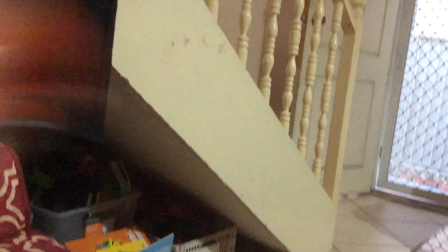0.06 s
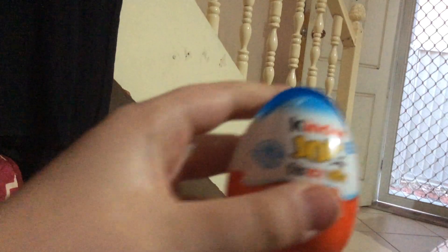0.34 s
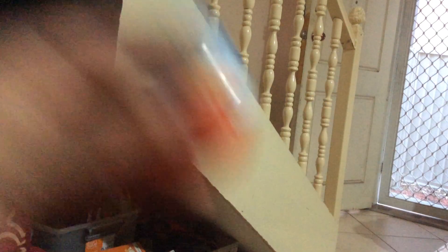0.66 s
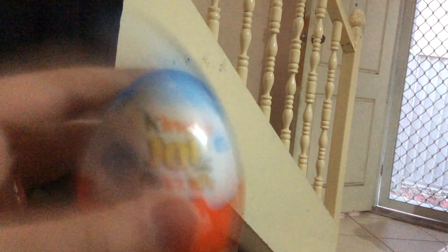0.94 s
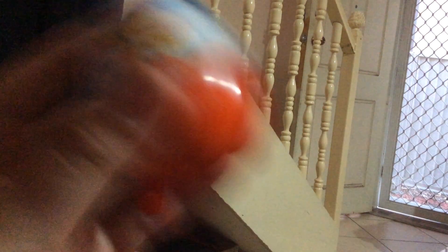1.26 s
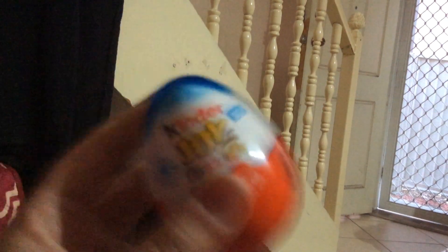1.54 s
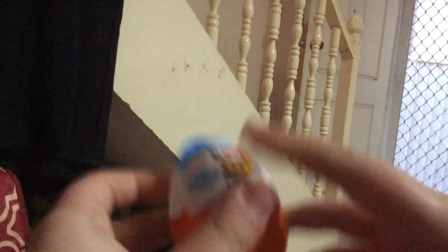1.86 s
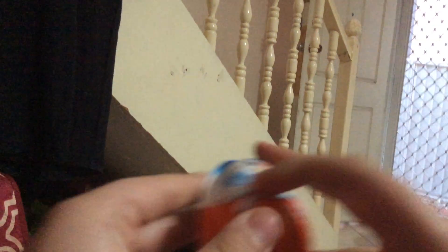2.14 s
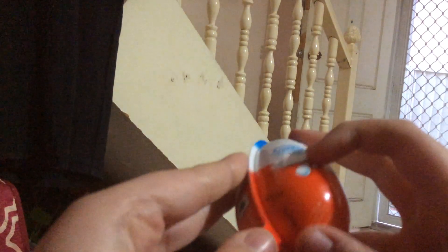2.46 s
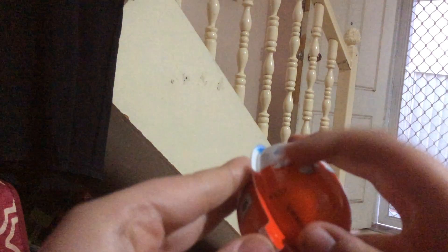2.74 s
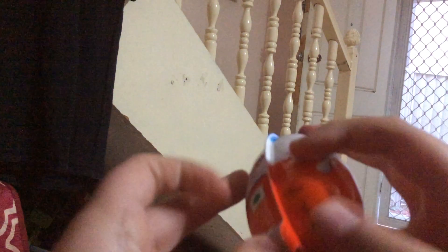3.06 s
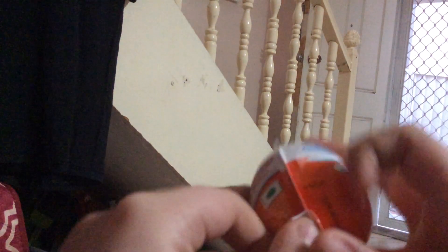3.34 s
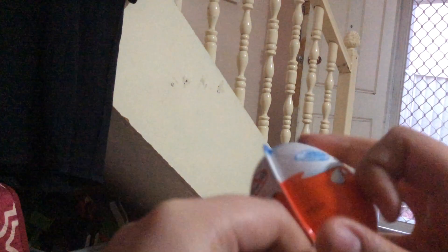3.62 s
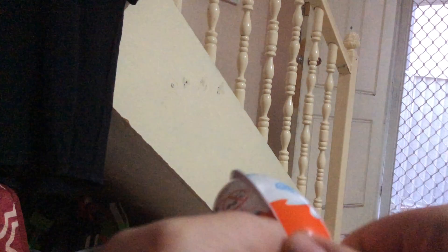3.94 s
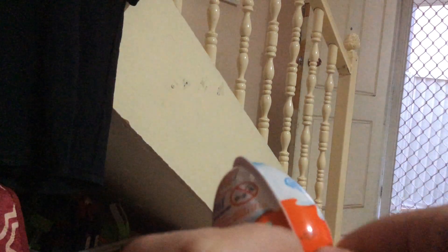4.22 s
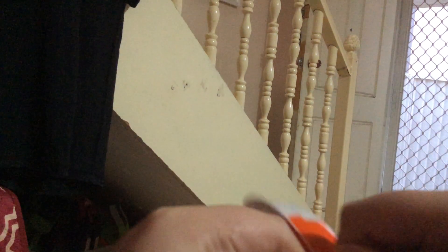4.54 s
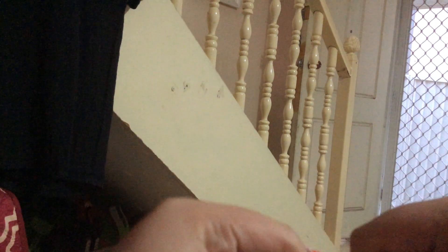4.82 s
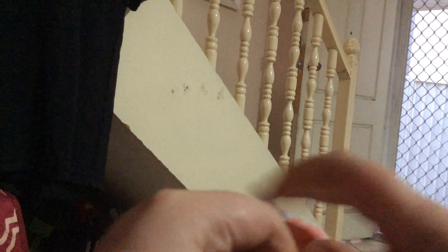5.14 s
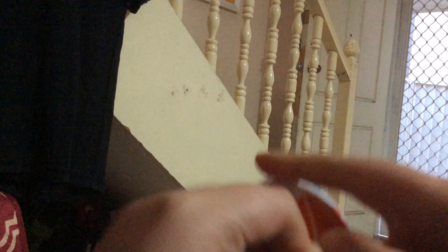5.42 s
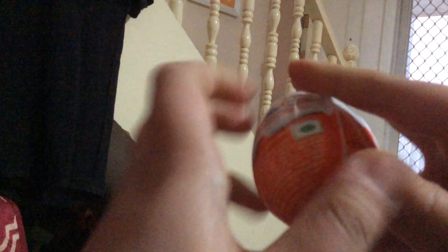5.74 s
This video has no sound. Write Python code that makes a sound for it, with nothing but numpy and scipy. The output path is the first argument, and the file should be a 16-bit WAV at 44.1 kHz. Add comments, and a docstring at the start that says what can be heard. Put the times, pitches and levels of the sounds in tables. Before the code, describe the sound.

Close to the microphone, hands turn a foil-wrapped plastic egg in a quiet room. Fine crinkling and a few snaps lead into a dense burst of sharp crackles with small knocks on the shell. A brief low drone passes, then fingers slide softly over the foil. More snaps follow, the loudest late on, before the grip gives two faint squeaks with a short hollow tone between them.

```python
"""Hands turn a foil-wrapped plastic egg close by, over the faint rumble and hiss of a quiet room.
From the start fingers slide on the foil, and friction excites a fine crinkling. Picked at, creases
buckle and knock the shell: a few snaps at 0.2 s, then a dense burst from 0.8 to 1.6 s. Near 1.9 s
something drones briefly in the bass. Soft sliding follows, with snaps at 3.5 s and the loudest at 4.6 s.
Last, the grip squeaks faintly twice near 3 kHz, with a faint, brief hollow tone near 1 kHz between."""
import sys
import numpy as np
from scipy import signal
from scipy.fft import rfft, irfft, next_fast_len
from scipy.io import wavfile
from scipy.ndimage import map_coordinates

SR = 44100
rng = np.random.default_rng(int(sys.argv[2]) if len(sys.argv) > 2 else 0)


def transcribe(signal):
    """Save signal, clipped to [-1, 1], as a 16-bit WAV file at the path in sys.argv[1]."""
    frames = np.atleast_2d(signal).T
    limited = np.clip(frames, -1, 1)
    pcm = np.round(limited * 32767).astype(np.int16)
    wavfile.write(sys.argv[1], SR, pcm)


N = 254898


def amp(db):
    """Amplitude ratio of a level in decibels."""
    return 10 ** (np.asarray(db) / 20)


def unit(x):
    """Normalisation to rms 1."""
    return x / np.sqrt(np.mean(np.abs(x) ** 2) + 1e-20)


def along(points, hz):
    """Interpolation of (f, value) points on a logarithmic frequency axis."""
    f, v = np.transpose(points)
    return np.interp(np.log(hz + 1), np.log(f + 1), v)


def wobble(knots, size):
    """Spline interpolation through random knots: a smooth random curve."""
    return map_coordinates(rng.standard_normal(int(knots) + 4), [np.arange(size) * knots / size])


def filtered(x, response):
    """Linear filtering: the spectrum of x times a frequency response."""
    m = next_fast_len(N + 8192)
    return irfft(rfft(x, m) * response(np.fft.rfftfreq(m, 1 / SR)), m)[:N]


def noise(spectrum):
    """Spectral shaping of white noise, at rms 1."""
    return unit(filtered(rng.standard_normal(N), lambda hz: amp(along(spectrum, hz))))


def ring(gain):
    """Minimum phase: the causal impulse response of a gain curve."""
    cepstrum = irfft(np.log(np.maximum(gain, 1e-6)))
    cepstrum[1:] *= 2
    cepstrum[len(cepstrum) // 2:] = 0
    return irfft(np.exp(rfft(cepstrum)))


def add(track, s, sound):
    """Superposition of a sound on the track at time s."""
    part = track[max(round(s * SR), 0):][:len(sound)]
    part += sound[:len(part)]


def envelope(start_s, length_s, attack_s, release_s, arch_db=4):
    """Exponential rise to the start, an arch over the length, then exponential decay."""
    gain = np.zeros(N)
    near = np.arange(max(int((start_s - .5) * SR), 0), min(int((start_s + length_s + .5) * SR), N))
    t = near / SR - start_s
    arch = amp(-arch_db * (2 * np.clip(t / length_s, 0, 1) - 1) ** 2)
    gain[near] = arch * np.exp(np.minimum(t, 0) / attack_s - np.maximum(t - length_s, 0) / release_s)
    return gain


# Spectra of the room's rumble and hiss: f/Hz, relative spectral density/dB
RUMBLE_SPECTRUM = [(13, -18), (22, -8.5), (59, 4.5), (77, -2.5), (97, -6.5), (135, -5), (178, -13.5),
                   (204, -15), (220, -7.5), (290, -44.5), (480, -120)]
HISS_SPECTRUM = [(80, 3.5), (200, 4), (600, -1), (1200, -3.5), (2500, -12), (6000, -21.5), (10000, -20),
                 (16000, -25)]
# Their slow drift: t/s, relative rumble level/dB, relative hiss level/dB
AMBIENT_LEVELS = [(0.0, -68, -65.5), (1.32, -61.5, -69), (2.35, -67.5, -71.5), (5.78, -68.5, -72.5)]


def ambient_noise(rumble_gain_db=1, hiss_gain_db=2):
    """Incoherent addition of two coloured noises: the room's low rumble and soft hiss."""
    t = np.arange(N) / SR
    times, rumble_db, hiss_db = np.transpose(AMBIENT_LEVELS)
    rumble = amp(np.interp(t, times, rumble_db) + rumble_gain_db) * noise(RUMBLE_SPECTRUM)
    hiss = amp(np.interp(t, times, hiss_db) + hiss_gain_db) * noise(HISS_SPECTRUM)
    return rumble + hiss


# Fingers sliding over the foil: t/s, duration/s, relative level/dB, tilt/(dB per octave)
FINGER_STROKES = [(0.0, 0.081, -64.5, 4.5), (0.135, 0.04, -59.5, 8.5), (0.22, 0.083, -61, 4.5),
                  (0.737, .08, -70.5, 5), (0.849, 0.027, -52, 3.5), (0.912, .02, -54, 4),
                  (1.023, 0.0064, -38.5, 9), (1.065, 0.0089, -44.5, 4), (1.131, .012, -43, 8),
                  (1.192, 0.023, -48.5, 6), (1.269, 0.013, -48, 5), (1.323, 0.028, -48.5, 5),
                  (1.399, 0.032, -49, 5.5), (1.455, 0.037, -51.5, 2), (1.545, 0.079, -51, 3),
                  (1.624, 0.068, -61, 1), (1.713, 0.063, -59, 3), (1.815, 0.32, -63, 1),
                  (2.122, 0.16, -59.5, 1.5), (2.336, .06, -66.5, 5), (2.497, .1, -61.5, 2),
                  (2.659, .11, -59.5, 0.5), (2.79, .09, -66, 7.5), (2.974, .048, -71, -3),
                  (3.053, 0.073, -62, 3.5), (3.185, 0.061, -63.5, 1), (3.303, 0.19, -58.5, 2.5),
                  (3.529, 0.096, -55, 1.5), (3.669, 0.037, -57.5, 1.5), (3.856, 0.032, -54.5, 3.5),
                  (3.896, 0.38, -57, 0.5), (4.028, 0.053, -52.5, -0.5), (4.259, .15, -56, 2.5),
                  (4.44, 0.21, -59, 5), (4.676, .17, -69, 2), (4.859, 0.14, -62.5, 1),
                  (5.05, 0.076, -58, 5.5), (5.15, .08, -66.5, 3.5), (5.301, 0.037, -63.5, 4),
                  (5.391, 0.034, -61, -.5), (5.539, 0.074, -64, 7), (5.672, 0.19, -61.5, -1)]


def rubbing(hold_db=-75.5, hold_tilt=-2, linger_db=-5.5, snap_tilt=12):
    """Incoherent sources add in power: the rustle's level and power-weighted spectral tilt."""
    power = np.full(N, amp(hold_db) ** 2)  # fingers that only hold the foil
    weighted_tilt = hold_tilt * power
    for s, length_s, db, tilt in FINGER_STROKES:
        firm = envelope(s, length_s, attack_s=.011, release_s=.0087)
        fade_s = min(.091, length_s)  # lighter contact before and after, brief for a quick stroke
        light = amp(linger_db) * envelope(s, length_s, fade_s, fade_s)
        stroke = amp(db) ** 2 * (firm ** 2 + light ** 2)
        power += stroke
        weighted_tilt += tilt * stroke
    lead = SR // 10
    t = np.arange(-lead, SR // 2) / SR
    loading = amp(-26.5) * np.exp(-np.abs(t) / .005)  # the foil bends towards a snap
    settling = amp(-33.5) * np.exp(-np.abs(t) / .022)  # and relaxes after it
    around_snap = np.where(t < 0, loading, settling)
    for s, db, *_ in CREASE_SNAPS:
        rustle = (amp(db) * around_snap) ** 2
        add(power, s - lead / SR, rustle)
        add(weighted_tilt, s - lead / SR, snap_tilt * rustle)
    return 10 * np.log10(power), weighted_tilt / power


# Spectrum of rubbed foil: f/Hz, relative spectral density/dB
FOIL_SPECTRUM = [(300, -19.5), (900, -7.5), (1500, -9.5), (2500, -4), (4000, -1.5), (5500, 0), (6400, -1.5),
                 (7800, -2), (8250, 0), (8800, -3), (11000, -10), (13000, -16.5), (15500, -26),
                 (16200, -58)]


def crinkle(rub_db, tilt, ticks_per_s=2000, spread_db=1, flutter_db=.78, uneven_db=1.1, gain_db=-1.5):
    """Forced vibration: ticks of tiny creases and skin friction excite the foil's many resonances."""
    sizes = amp(spread_db * np.minimum(rng.exponential(size=N), 5)) * rng.choice([-1, 1], N)
    ticks = unit(sizes * (rng.random(N) < ticks_per_s / SR))
    sheet = lambda hz: amp(along(FOIL_SPECTRUM, hz) + uneven_db * wobble(hz[-1] / 100, len(hz)))
    friction = unit(filtered(ticks + rng.standard_normal(N), sheet))
    # the tilt tips the balance of octave bands about 5 kHz
    octaves = np.arange(-2, 3)
    bands = np.array([filtered(friction, lambda hz: np.interp(np.log2((hz + 1) / 5000), octaves, row))
                      for row in np.eye(len(octaves))])
    gains = amp(octaves[:, None] * tilt)
    gains /= np.sqrt(np.average(gains ** 2, axis=0, weights=bands.var(axis=1)))
    flutter = flutter_db * wobble(70 * N / SR, N)
    return amp(rub_db + gain_db + flutter) * (gains * bands).sum(axis=0)


# Decay of the room: f/Hz, reverberation time T60/s
REVERB_TIMES = [(200, 0.44), (2000, 0.44), (8000, 0.24), (16000, 0.076)]


def reverberation(x, delay_s=.004, wall_s=.0088, wall_db=-4):
    """Convolution with the room's response: a near wall's reflection and a short diffuse tail."""
    hz, t, spectra = signal.stft(rng.standard_normal(SR // 2), SR, nperseg=256)
    decay = amp(-60 * t / along(REVERB_TIMES, hz)[:, None])
    tail = signal.istft(spectra * decay, SR, nperseg=256)[1]
    response = np.pad(tail / np.linalg.norm(tail), (int(delay_s * SR), 0))
    scatter = rng.standard_normal(SR // 500) * np.hanning(SR // 500)
    add(response, wall_s - .001, amp(wall_db) * scatter / np.linalg.norm(scatter))
    return signal.fftconvolve(x, response)[:N]


# Resonances of the plastic shell under the foil: f/Hz, bandwidth/Hz, lift/dB
SHELL_MODES = [(2590, 120, 4), (4710, 1500, 6.5), (8250, 4100, 4.5)]
# Spectra of the shell's knock and the crease edge's crack: f/Hz, relative level/dB
KNOCK_SPECTRUM = [(100, -14), (500, -1.5), (1100, -5.5), (2500, 5), (5000, -4), (10000, -43.5)]
CRACK_SPECTRUM = [(6000, -24), (10500, -1.5), (13000, -4), (15500, -12), (20000, -45.5)]


def snap(pitch_hz, knock_db, crack_db, relative_width=.28, flip_s=.0015, dispersion_s=.001106):
    """Snap-through buckling: a crease's facet rings briefly, knocks the shell and flips once more."""
    hz = np.fft.rfftfreq(1024, 1 / SR) + 1
    facet = hz / (hz + 2000) / (1 + np.abs((hz / pitch_hz - 1) / relative_width) ** 2.36)
    knock = amp(along(KNOCK_SPECTRUM, hz))
    crack = amp(along(CRACK_SPECTRUM, hz))
    parts = [(0, facet), (knock_db - 3, knock), (crack_db, crack)]
    shell_db = sum(db / (1 + (2 * (hz - centre) / width) ** 2) for centre, width, db in SHELL_MODES)

    def buckle():
        """Each flip adds uneven resonances to the shell's; the parts sum in power."""
        resonances = amp(shell_db + 2.8 * wobble(48, len(hz)))
        return ring(np.linalg.norm([amp(db) * unit(shape * resonances) for db, shape in parts], axis=0))

    flip = amp(-2.5 + .46 * knock_db)  # a harder knock gives a larger second flip
    pulse = buckle()
    add(pulse, flip_s * rng.uniform(.822, 1.5), flip * buckle())
    # bending waves are dispersive: low frequencies arrive later
    delay_s = dispersion_s / (1 + (hz / 6000) ** 2)
    pulse = irfft(rfft(pulse) * np.exp(-2j * np.pi * np.cumsum(delay_s) * (hz[1] - hz[0])))
    return pulse * np.sqrt(SR / 1000 / (1 + flip ** 2))  # facet energy of about 1 ms at rms 1


def small_creases(rub_db, per_s=20, pitch_hz=7000, pitch_spread=.12, above_rub_db=1, spread_db=4.5):
    """Buckling at random times: lesser creases give way, their level following the rubbing."""
    track = np.zeros(N)
    count = int(per_s * N / SR)
    for onset, (size, detune) in zip(rng.integers(N, size=count), rng.standard_normal((count, 2))):
        pulse = snap(pitch_hz * np.exp(pitch_spread * detune), knock_db=-9.5, crack_db=-14)
        add(track, onset / SR, amp(rub_db[onset] + above_rub_db + spread_db * size) * pulse)
    return track


def creak(pulse, rise_s=.0024):
    """Microslip under strain: tiny slips grow louder in the 20 ms before a crease gives way."""
    t = np.arange(-SR // 50, 0) / SR
    slips = rng.standard_normal(len(t)) * np.exp(t / rise_s)
    return signal.fftconvolve(slips / np.linalg.norm(slips), pulse)


def thud(centre_hz=320):
    """Volume displacement: the denting wall moves the air once, a low pulse with no ring."""
    t = np.arange(int(2 * SR / centre_hz)) / SR
    phase = np.pi * (centre_hz * t - 1)
    return (2 * phase ** 2 - 1) * np.exp(-phase ** 2)


# Large creases buckling: t/s, facet level over 1 ms/dB, f/Hz, relative knock/dB, relative crack/dB
CREASE_SNAPS = [(0.2245, -27.5, 7600, -13, -26), (0.257, -34.5, 6450, -4, -13),
                (0.2751, -41.5, 6950, -7, -14), (0.8363, -32.5, 6100, -17, -28),
                (0.8408, -37, 6880, -21, -11), (0.85, -36.5, 6500, -16, -18),
                (0.9099, -38.5, 6600, -16, -26), (0.9327, -20.5, 6700, -5, -1.5),
                (0.9536, -27.5, 8000, -8, -2.5), (0.9971, -21, 5700, -13, -37),
                (1.0143, -32, 6860, -9, -22), (1.055, -27.5, 6500, -2.5, -3.5),
                (1.0698, -25.5, 7000, -5.5, -6), (1.0766, -32.5, 8030, -5.5, -15),
                (1.139, -21, 5120, -15.5, -36), (1.1449, -32, 8500, -12, -17),
                (1.195, -33.5, 8670, -3, 2.5), (1.1997, -35, 6900, -10, -24), (1.2065, -38, 8740, -4, 4),
                (1.2757, -33.5, 6650, -11.5, -20), (1.2833, -39, 6800, -25, -15),
                (1.3138, -36, 8050, -3, -1.5), (1.4131, -36.5, 6660, -11, -18),
                (1.4483, -31.5, 7800, -3.5, -1.5), (1.4636, -36.5, 7960, -8.5, -6),
                (1.476, -41, 7880, -7, -8), (1.4828, -37.5, 8340, -15, -11),
                (1.5514, -35, 7400, -14.5, -16), (1.5949, -38, 5770, -2, -2),
                (1.7177, -46.5, 6800, -36, -16), (1.786, -54.5, 6000, -1.5, -6),
                (1.995, -48.5, 6540, -4, -14), (3.0579, -55, 7830, 2, -0.5),
                (3.5468, -36.7, 7800, -12, -16), (3.5531, -28.5, 8100, -16.5, -8.5),
                (4.373, -21.5, 7030, -30.5, -4.5), (4.4997, -41.5, 7000, -22, -7),
                (4.5206, -31, 7450, -34, -5.5), (4.5497, -34.5, 8200, -33, -18),
                (4.579, -33.5, 7700, -25, -18), (4.5999, -11.5, 7800, -31.5, -19),
                (5.1712, -37, 7000, -6, -19), (5.3073, -40.5, 7200, -18, -39)]


def large_creases(creak_db=-22, thud_db=-8):
    """Release of stored elastic energy: each large crease creaks, then snaps with a thud."""
    track = np.zeros(N)
    for s, db, pitch_hz, knock_db, crack_db in CREASE_SNAPS:
        pulse = amp(db) * snap(pitch_hz, knock_db, crack_db)
        add(track, s - .02, amp(creak_db) * creak(pulse))
        add(track, s, pulse)
        add(track, s - .0025, amp(db + knock_db + thud_db) * thud())
    return track


# Inharmonic resonances of the drone: f/Hz, bandwidth/Hz, relative level/dB
DRONE_PARTIALS = [(158, 7.5, 0.5), (204, 23, -13.5), (343.5, 65, -12.5), (402, 14.6, -16.5), (552, 51, -21)]


def drone(start_s=1.885, length_s=.11, level_db=-52, cutoff_hz=800):
    """Line broadening: random phase drift widens a few low partials into a short, rough drone."""
    t = np.arange(N) / SR
    tone = 0
    for hz, width_hz, db in DRONE_PARTIALS:
        drift = np.cumsum(rng.standard_normal(N)) * np.sqrt(2 * np.pi * width_hz / SR)
        tone = tone + amp(db) * np.sin(2 * np.pi * hz * t + drift)
    swell = envelope(start_s, length_s, attack_s=.008, release_s=.043, arch_db=3)
    return amp(level_db) * swell * unit(filtered(tone, lambda hz: 1 / (1 + (hz / cutoff_hz) ** 4)))


# Two grip squeaks and a hollow tone between them: centre t/s, half duration/s, f/Hz, level/dB
SQUEAKS_AND_TONE = [(4.989, 0.064, 3070, -70.5), (5.383, 0.04, 1040, -68.5), (5.71, 0.048, 3400, -67.5)]


def squeaks_and_tone(relative_width=.09):
    """Narrow-band noise has pitch: stick-slip squeaks near 3 kHz, and a hollow tone near 1 kHz."""
    track = np.zeros(N)
    t = np.arange(SR // 2) / SR
    hz = np.fft.rfftfreq(len(t), 1 / SR)
    for s, half_s, centre_hz, db in SQUEAKS_AND_TONE:
        resonance = 1 / (1 + ((hz / centre_hz - 1) / relative_width) ** 2)
        band = irfft(rfft(rng.standard_normal(len(t))) * resonance, len(t))
        swell = np.exp(-.5 * ((t - t.mean()) / half_s) ** 2)
        add(track, s - t.mean(), amp(db) * swell * unit(band))
    return track


def scene(reverb_db=-22):
    """Superposition: the direct sound, its weak reverberation and the surroundings."""
    rub_db, tilt = rubbing()
    surroundings = drone() + ambient_noise()
    direct = large_creases() + crinkle(rub_db, tilt) + squeaks_and_tone() + small_creases(rub_db)
    return (direct + amp(reverb_db) * reverberation(direct) + surroundings)[None]


def record(dry, low_hz=28, top_hz=16100):
    """Band limiting: the camera cuts the deepest bass and the highest treble."""
    high_pass = lambda hz: hz ** 6 / (hz ** 6 + low_hz ** 6)
    low_pass = lambda hz: np.clip((top_hz - hz) / 800 + .5, 0, 1)
    return np.array([filtered(channel, lambda hz: high_pass(hz) * low_pass(hz)) for channel in dry])


dry = scene()
out = record(dry)
transcribe(out)
```